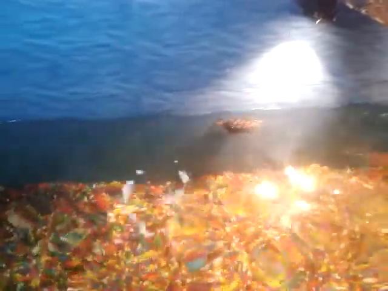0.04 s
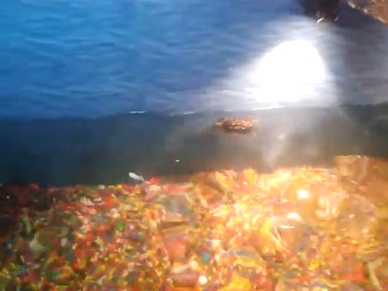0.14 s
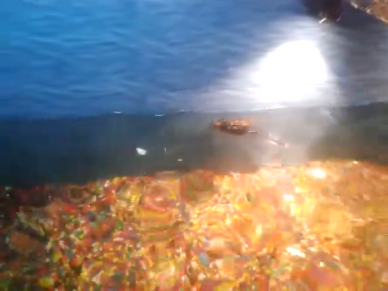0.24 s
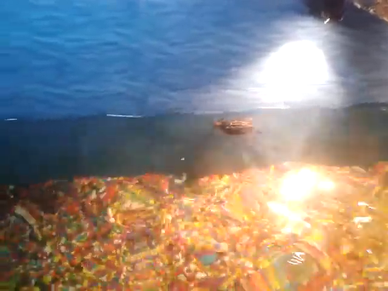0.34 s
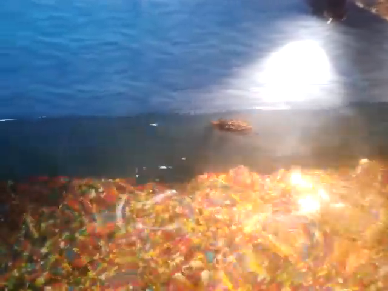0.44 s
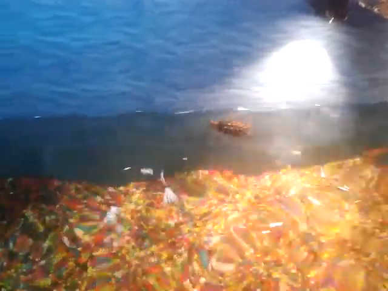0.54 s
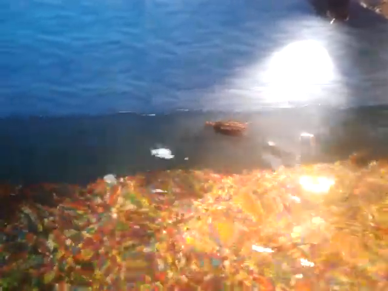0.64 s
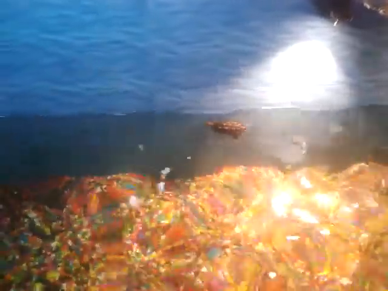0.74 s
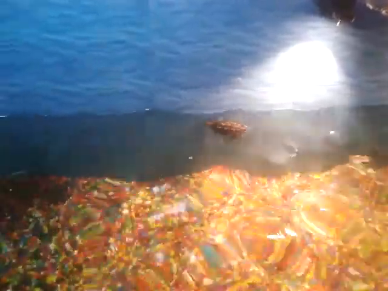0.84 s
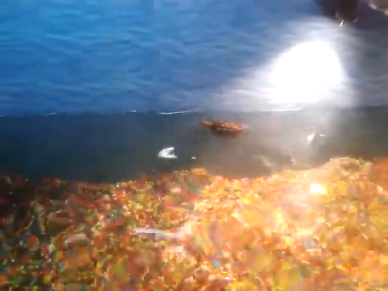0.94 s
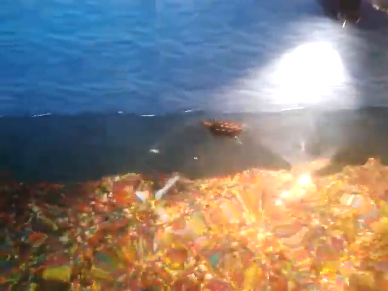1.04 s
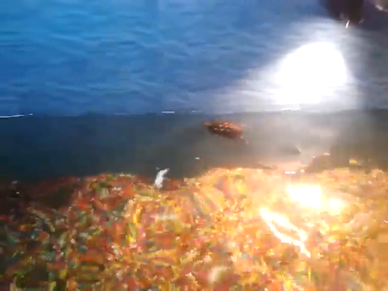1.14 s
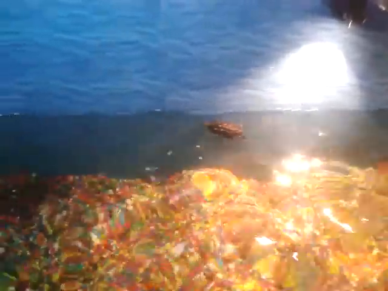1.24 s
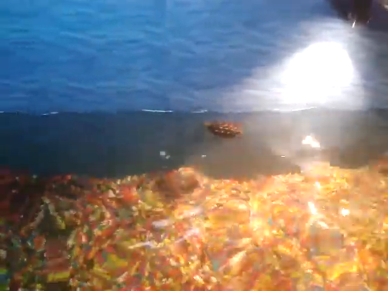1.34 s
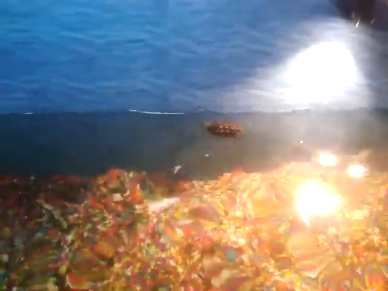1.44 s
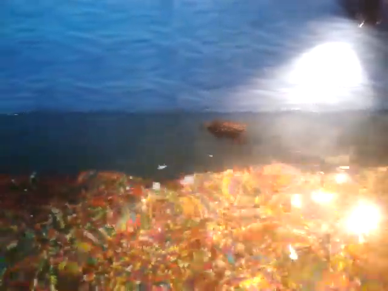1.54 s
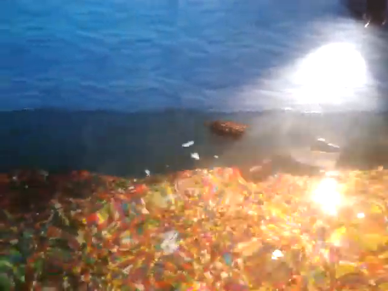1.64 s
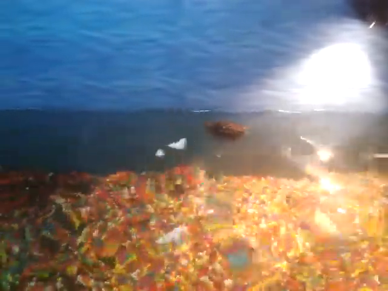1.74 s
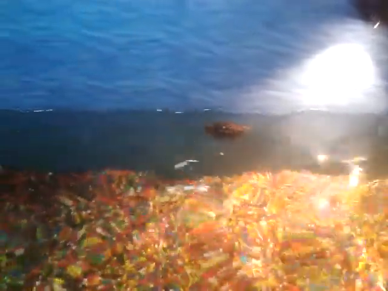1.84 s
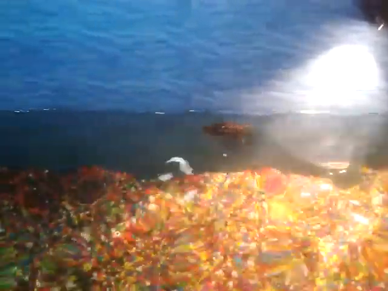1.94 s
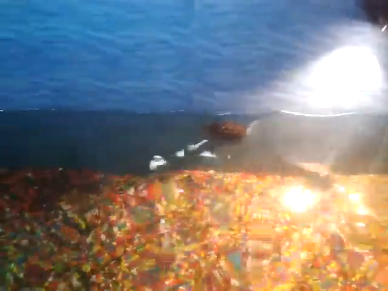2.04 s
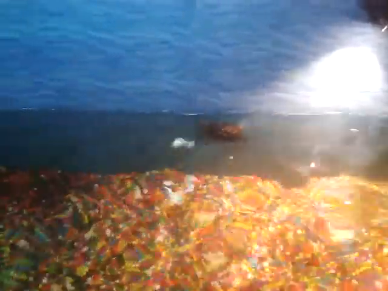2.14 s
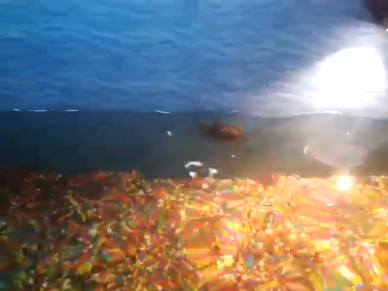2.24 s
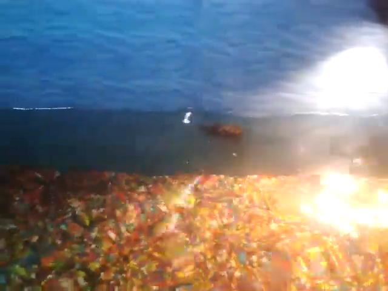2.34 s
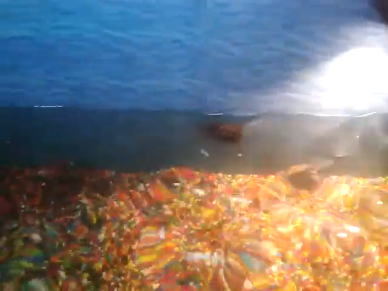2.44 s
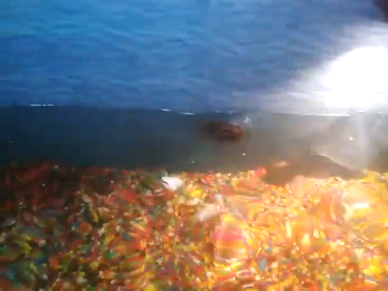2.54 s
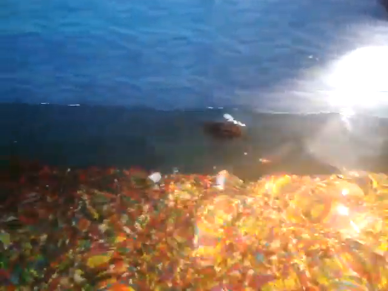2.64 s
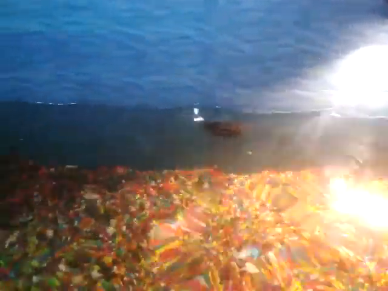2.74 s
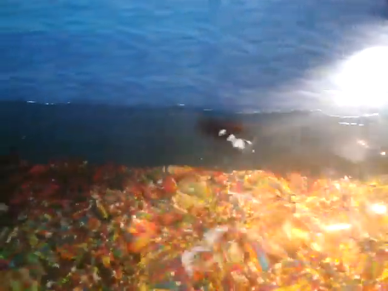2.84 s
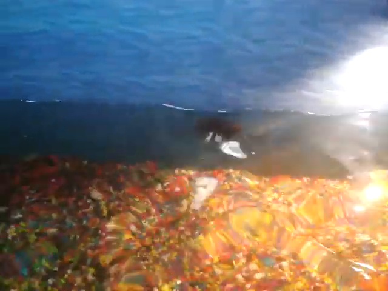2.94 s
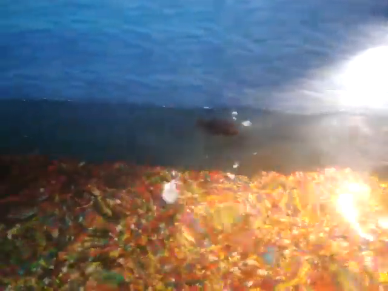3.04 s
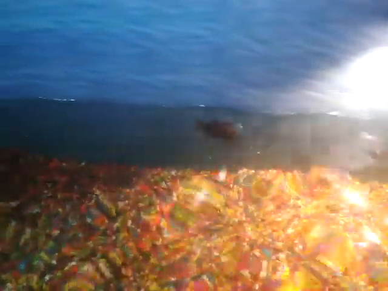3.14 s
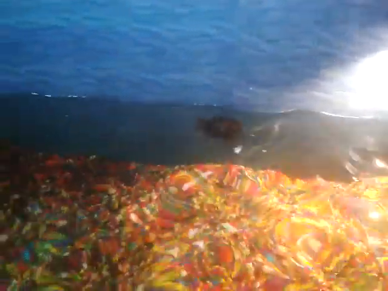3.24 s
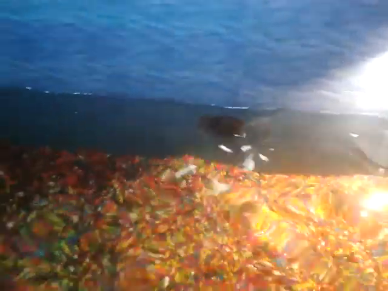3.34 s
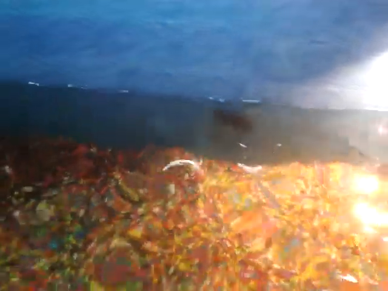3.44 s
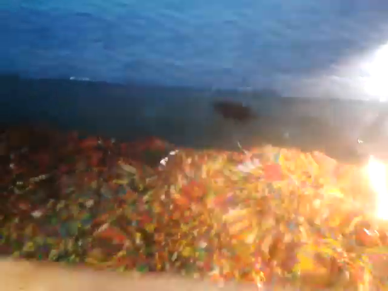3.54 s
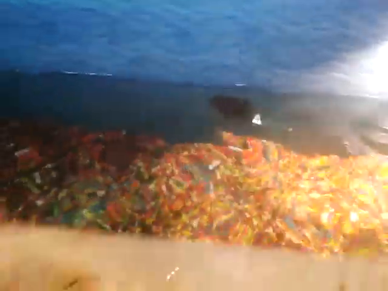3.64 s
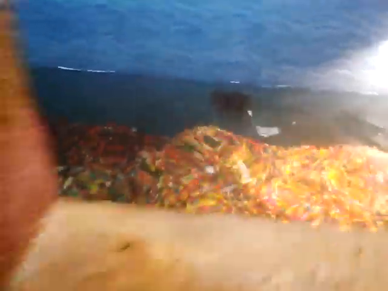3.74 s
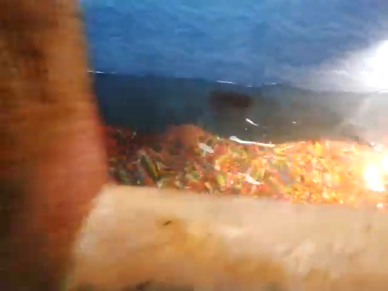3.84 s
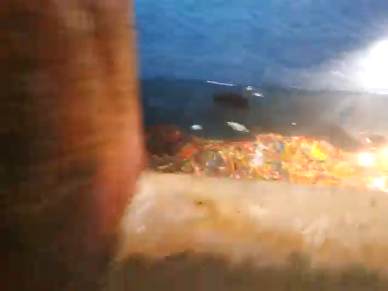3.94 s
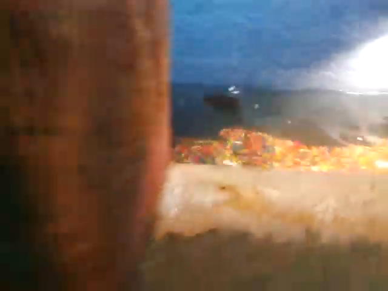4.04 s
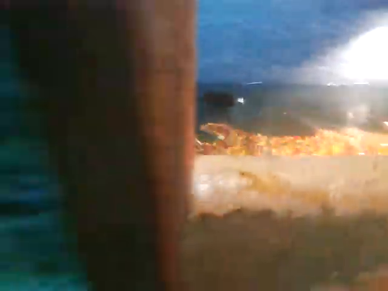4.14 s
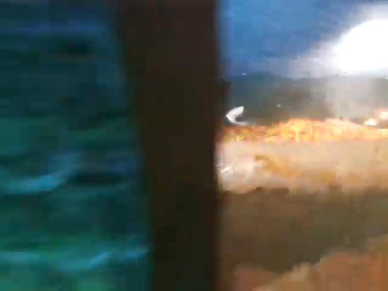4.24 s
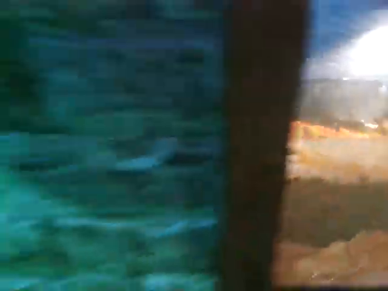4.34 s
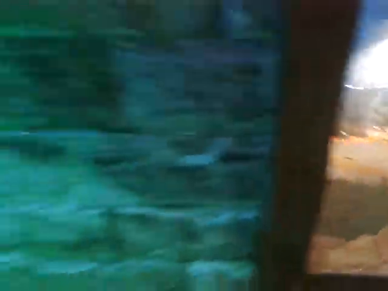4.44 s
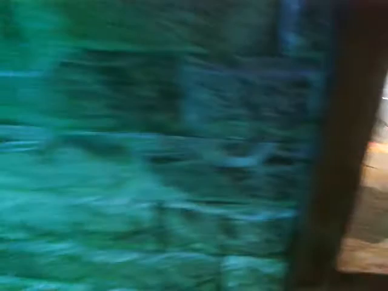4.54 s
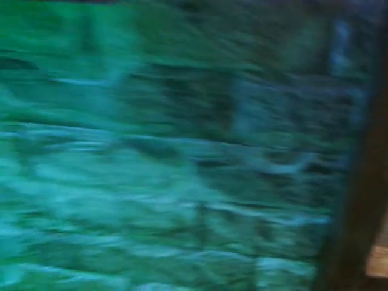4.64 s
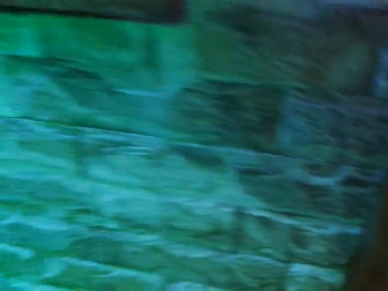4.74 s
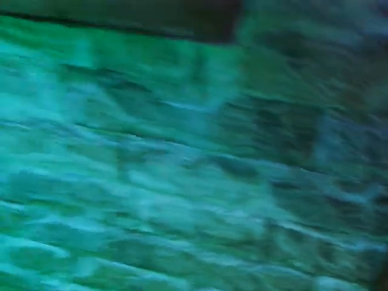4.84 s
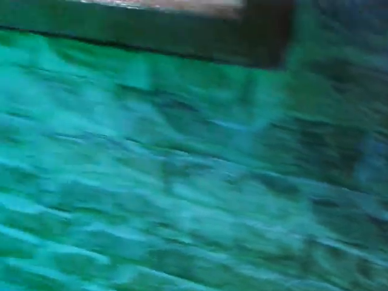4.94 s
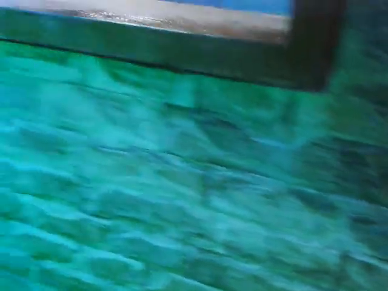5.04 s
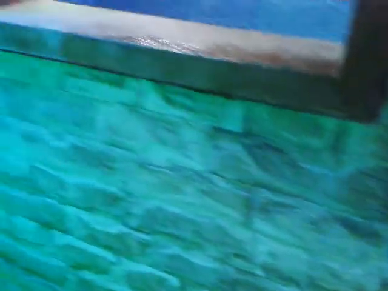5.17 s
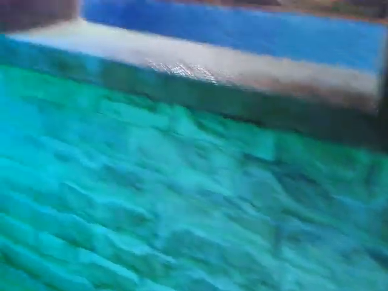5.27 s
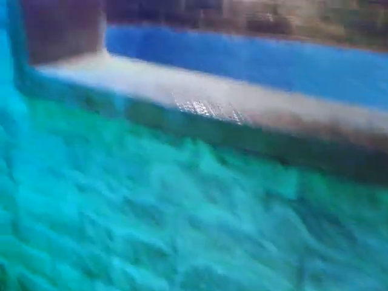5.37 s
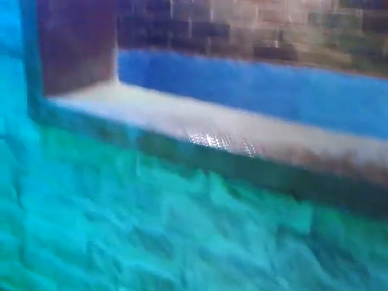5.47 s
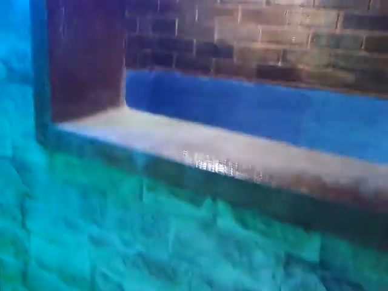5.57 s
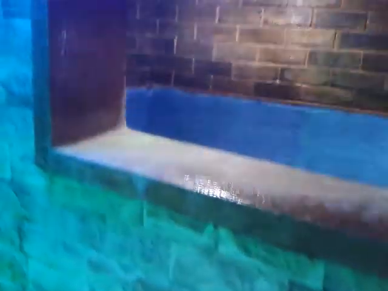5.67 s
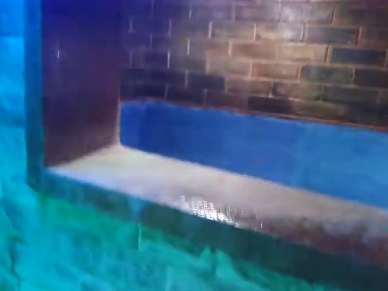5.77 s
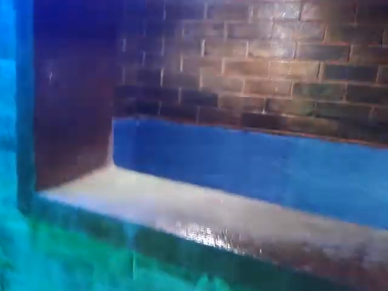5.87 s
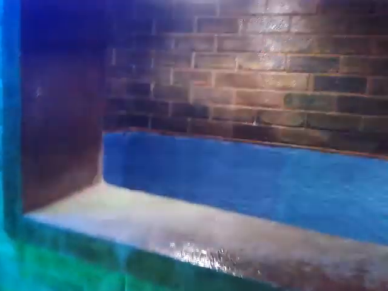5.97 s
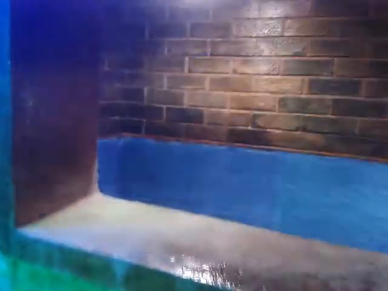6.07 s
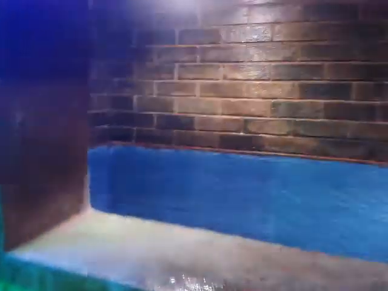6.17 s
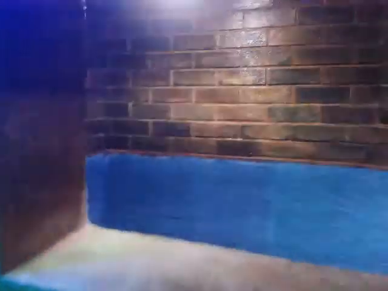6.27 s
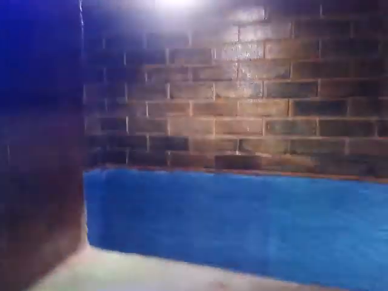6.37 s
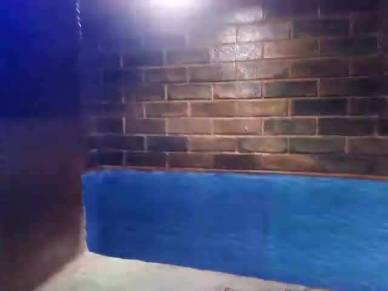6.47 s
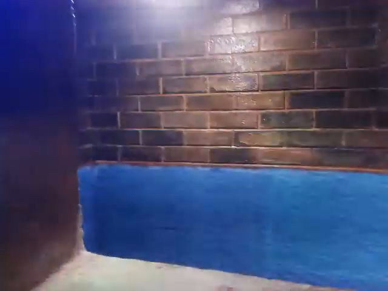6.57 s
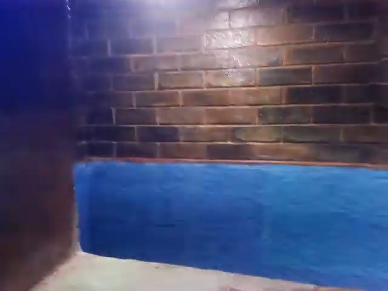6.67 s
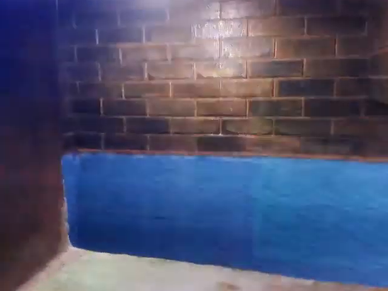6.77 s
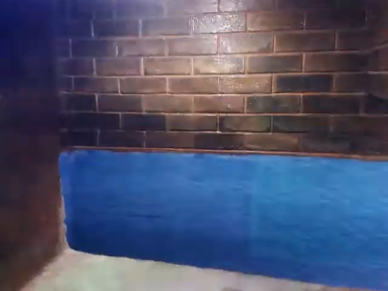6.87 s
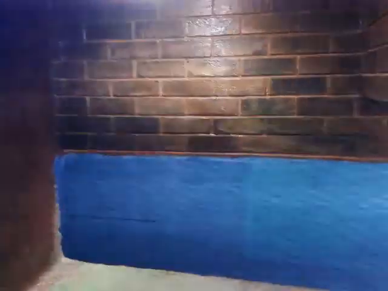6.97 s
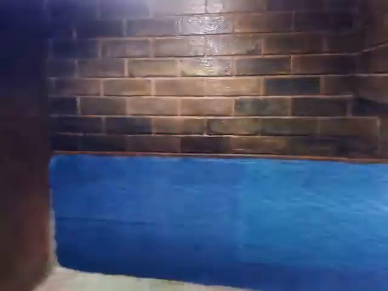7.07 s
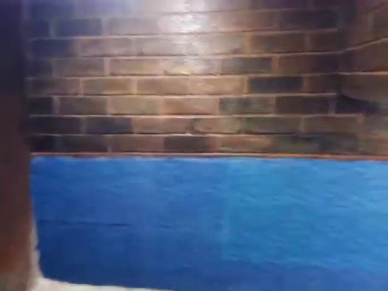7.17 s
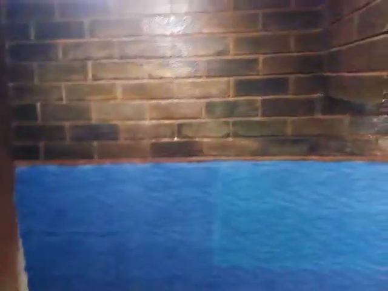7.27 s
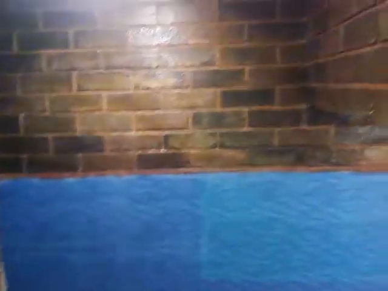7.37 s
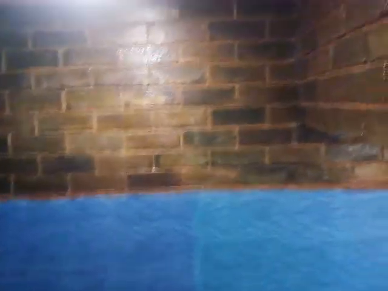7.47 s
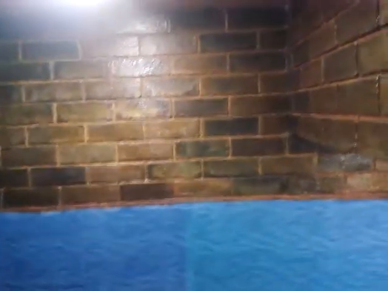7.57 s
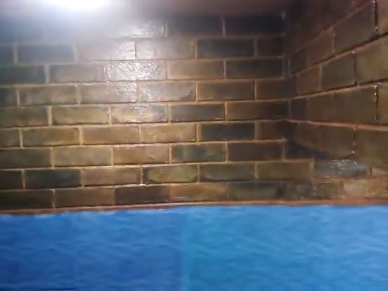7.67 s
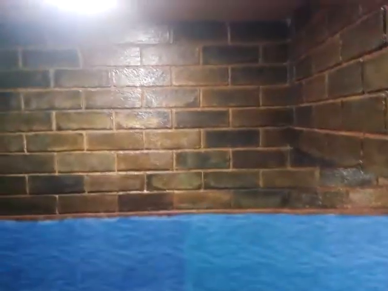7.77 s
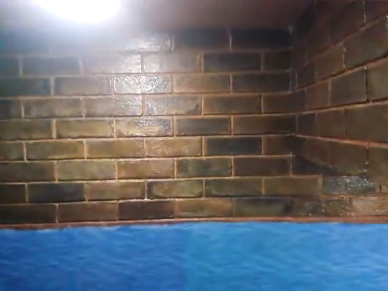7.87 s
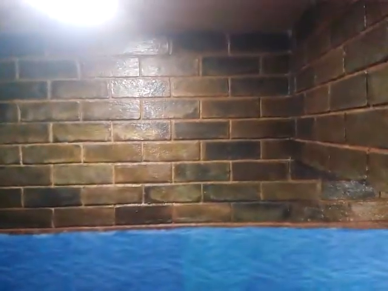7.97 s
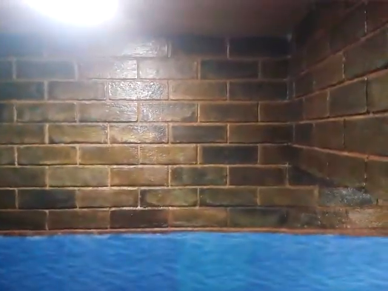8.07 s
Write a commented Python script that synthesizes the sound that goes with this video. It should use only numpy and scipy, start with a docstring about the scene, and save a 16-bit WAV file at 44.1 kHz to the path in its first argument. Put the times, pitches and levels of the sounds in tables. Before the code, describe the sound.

Close steady splashing water with bubbles and wet slaps, fading behind a wall, pulsing unevenly, then growing stronger after a short high squeak.

```python
"""Tiled indoor pond with a small ornamental waterfall: drops patter, bubbles ring, the plunge gurgles.
The microphone starts close to the fall, turns away behind a wall and comes round to another opening,
where the splashing arrives in stronger surges. One brief squeak sounds near the end.
Drops, slaps and spray are noise bursts, bubbles decaying sines, hiss shaped noise, the squeak a swept sine."""
import sys
import numpy as np
from scipy import signal
from scipy.fft import rfft, irfft, next_fast_len
from scipy.io import wavfile
from scipy.ndimage import map_coordinates

SR = 44100
rng = np.random.default_rng(int(sys.argv[2]) if len(sys.argv) > 2 else 0)


def to_wav(s):
    """Save 16-bit WAV."""
    ch = np.atleast_2d(s).T  # columns
    pcm = np.round(np.clip(ch, -1, 1) * 32767)  # PCM
    wavfile.write(sys.argv[1], SR, pcm.astype(np.int16))


N = 357651

# how directly the microphone faces the fall: t/s, share/0-1
FACING = [(0, 1), (2.3, 0.89), (3.8, 1), (4.7, 0.92), (5.25, 0.05), (6.8, 0.08), (7.3, 0.3), (8.1, 0.05)]
# closeness of the microphone to the basin rim: t/s, share/0-1
RIM_CLOSENESS = [(3.7, 0.7), (4.1, 0.26), (8.1, 0.05)]
# level of the fall between surges, before layer offsets: t/s, level/dB
FALL_LEVEL = [(0, -17), (3.85, -17.5), (3.95, -18.5), (4.35, -22), (5.2, -25), (5.95, -25.5), (6.85, -24.5),
              (7.15, -21), (8.11, -17.5)]
# the stream lands more heavily for a moment: start/s, length/s, gain/dB
SURGES = [(.08, 0.083, 2), (0.186, 0.12, 1), (0.608, .23, 1), (.85, 0.084, 2), (1.194, 0.31, 1.4),
          (1.62, 0.18, 1.5), (1.97, .09, 1), (2.14, 0.15, 2.5), (2.365, 0.14, 2.4), (2.553, 0.13, 1.5),
          (2.712, .16, 2.5), (2.922, 0.086, 1), (3.116, 0.29, 2), (3.464, 0.52, 1.1), (3.998, 0.2, 2),
          (4.208, 0.11, 2.5), (4.45, 0.25, 2.6), (4.723, 0.17, 3.5), (4.922, .1, 3), (5.23, .12, 3.5),
          (5.433, .11, 4.5), (5.54, .15, 3.5), (5.695, .11, 4.5), (6.012, 0.2, 4.6), (6.311, 0.16, 8),
          (6.577, 0.21, 8), (6.902, .28, 3.8), (7.22, .11, 2.0), (7.355, .14, 5), (7.584, .19, 3.3),
          (7.98, 0.1, 1.5)]
# relative spectra facing the fall (NEAR) and round the wall (FAR): f/Hz, level/dB per Hz
PATTER_NEAR = [(200, -75), (1500, -8.5), (2600, -13), (3300, -7), (4000, -5), (4700, -7), (5150, -0.5),
               (5520, 2), (5950, -4.5), (6500, -9), (7700, -10.5), (8900, -18), (10700, -19.5),
               (12700, -26)]
PATTER_FAR = [(200, -82), (1500, -20), (2600, -6.5), (3400, -4.5), (4000, 0.5), (4500, -3), (5200, -1),
              (5750, 1), (6800, -7), (7800, -6), (9300, -16.5), (10700, -16), (12700, -27), (14500, -23.5)]
BUBBLING_NEAR = [(200, -92), (1100, -20.5), (1200, -2.5), (1400, -2.5), (1600, 0.5), (2000, 2.5), (2320, 2),
                 (2700, -1), (3400, -20), (6000, -35)]
BUBBLING_FAR = [(200, -51), (900, -12), (1450, -5), (1800, 2), (2100, 2.5), (2400, 0), (2750, -7.5),
                (3400, -19), (6000, -52)]
# relative gurgle spectra at the rim and away from it: f/Hz, level/dB
GURGLE_NEAR = [(25, -70), (60, -47), (100, -31), (145, -26), (175, -12.5), (280, -14.5), (380, -7.5),
               (650, -2.5), (850, 1), (1050, 1.5), (1250, 0.5), (3000, -52)]
GURGLE_FAR = [(25, -70), (120, -31), (230, -9.5), (290, -13), (380, -5.5), (460, -7.5), (590, -5.5),
              (720, 0.5), (1050, 5.5), (1250, -4.5), (3000, -52)]
# hollow basin resonances, gain at full rim closeness: f/Hz, width/Hz, gain/dB over the water
BASIN_MODES = [(175.6, 13.5, 10.5), (230.6, 12.5, 12), (328.6, 8, 3.5), (458.4, 4.3, 12.5), (490, 6, 5),
               (860, 6.3, 9.5), (1004, 7, 3.5), (1242, 29, -15), (1482, 11, -24), (1720, 7.9, -21),
               (2130, 10, -9), (2312, 11, 6.5)]
# air pockets breaking into bubbles, before room and low cut: t/s, f/Hz, level/dB, length/s, pitch scatter/share
PLOPS = [(.002, 3180, -17, 0.035, 0.09), (0.191, 1600, -18, 0.024, 0.06), (.232, 1810, -14.5, 0.019, 0.061),
         (0.247, 2220, -24, 0.016, .04), (0.311, 1255, -24.5, .05, .06), (0.53, 780, -25, 0.015, 0.029),
         (.68, 2070, -22, 0.056, .03), (0.755, 2850, -17, .035, 0.1), (0.878, 1230, -26, 0.095, 0.014),
         (1.01, 1720, -18, 0.014, 0.013), (1.3, 365, -35.5, 0.059, 0.047), (1.34, 880, -27, 0.031, 0.077),
         (1.48, 807, -19.5, 0.032, 0.11), (1.5, 1120, -22, 0.03, .1), (1.5, 458, -27, 0.029, 0.14),
         (2.785, 2380, -21, 0.02, 0.028), (2.84, 610, -32, 0.058, 0.16), (2.91, 230.5, -35.5, 0.037, 0.037),
         (3.06, 1500, -23, 0.052, .012), (3.537, 2186, -22.5, .14, .001), (3.52, 1560, -26, .11, .012),
         (3.74, 2600, -21, .035, 0.068), (3.83, 1640, -19.5, 0.025, 0.1), (3.85, 776, -26.5, 0.038, 0.16),
         (4.939, 1980, -21, 0.033, 0.018), (5.474, 2570, -17.5, 0.018, .012),
         (5.49, 1544, -26.5, 0.023, .025), (5.555, 260, -45, 0.14, 0.034), (7.655, 2080, -19.5, 0.038, .02)]
# gobs of water slapping the surface, force envelopes: t/s, level/dB, t60/s
SLAPS = [(.197, -19, 0.022), (.236, -14, .05), (0.272, -10, .07), (0.768, -14, 0.026), (1.261, -16, 0.071),
         (1.645, -17, .12), (1.93, -15, 0.13), (2.38, -18, 0.32), (2.94, -15, .14), (4.02, -31.5, .015),
         (4.754, -32, 0.098), (6.672, -24, .04), (7.394, -14.5, 0.2)]
# relative slap spectrum: f/Hz, level/dB per Hz
SLAP_COLOUR = [(150, -70), (900, -26), (2000, 1), (4600, -4), (5600, 15.5), (6800, 4), (9000, -4.5),
               (12000, -10), (15700, -20)]
# decay of the tiled walls: f/Hz, t60/s
ROOM_T60 = [(200, 0.38), (2000, 0.54), (12000, 0.24)]

TOP_HZ = 15750
SURGE_SKEW, SURGE_ROUND = 0.88, 1  # powers: bring the crest forward, shape the flanks
# the plunge carries round the wall better: level, shares of the wall's loss and of the surges
PLUNGE_DB, PLUNGE_LOSS, PLUNGE_SURGE = -33, 0.48, 0.43
# start, pitch before bend and sag, level as the attack ends
SQUEAK_S, SQUEAK_HZ, SQUEAK_DB = 7.11, 3220, -17.5
LN_T60 = np.log(1000)  # 60 dB as an exponent


def amp(db):
    """Decibels to gain."""
    return 10 ** (np.asarray(db) / 20)


def unit(x):
    """Scale to rms 1."""
    return x / np.sqrt(np.mean(x ** 2) + 1e-20)


def along(points, hz):
    """Read (Hz, value) points on a log frequency axis."""
    f, v = np.transpose(points)
    return np.interp(np.log(hz + 1), np.log(f + 1), v)


def curves(rows):
    """One value per sample for each column after the time."""
    s, *cols = np.transpose(rows)
    return [np.interp(np.arange(N) / SR, s, c) for c in cols]


def wobble(knots_per_s):
    """Smooth random curve."""
    knots = rng.standard_normal(N // 100)
    return map_coordinates(knots, [np.arange(N) * knots_per_s / SR], mode="mirror")


def filtered(x, response):
    """Multiply the spectrum of x by a response of frequency."""
    size = next_fast_len(N + SR // 2)
    spectrum = rfft(x, size) * response(np.fft.rfftfreq(size, 1 / SR))
    return irfft(spectrum, size)[..., :N]


def coloured(x, spectrum):
    """Shape x by (Hz, dB) points, at rms 1."""
    return unit(filtered(x, lambda hz: amp(along(spectrum, hz))))


def add(track, s, sound):
    """Mix a sound into a track at time s."""
    start = max(round(s * SR), 0)
    track[start:start + len(sound)] += sound[:N - start]


def room(x, wet_db):
    """Diffuse answer of the tiled walls; it changes as splashes and microphone move, every 1/8 s."""
    wet, step = np.zeros(N), SR // 8
    for start in range(0, N, step):
        hz, t, z = signal.stft(rng.standard_normal(SR // 3), SR, nperseg=256)
        decay = np.exp(-LN_T60 * t / along(ROOM_T60, hz)[:, None])
        tail = signal.istft(z * decay, SR, nperseg=256)[1]
        tail /= np.linalg.norm(tail)
        add(wet, start / SR, signal.fftconvolve(x[start:start + step], tail))
    return x + amp(wet_db) * wet


def heard(x, near, far):
    """Direct sound while the fall is faced, reflected sound from round the wall."""
    share = np.clip(curves(FACING)[0], 0, 1)
    reflected = np.roll(room(x, wet_db=-9.0), SR // 10)  # 0.1 s by way of the far walls
    return np.sqrt(share) * coloured(x, near) + np.sqrt(1 - share) * coloured(reflected, far)


def basin(x):
    """Add the basin's resonant modes, strong only close to its rim."""
    def modes(f):
        return sum(amp(db) * 1j * f * w / (c * c - f * f + 1j * f * w) for c, w, db in BASIN_MODES)
    return x + curves(RIM_CLOSENESS)[0] * filtered(x, modes)


def surge_db():
    """Each surge is a rounded swell that rises a little faster than it ebbs."""
    t = np.arange(N) / SR
    total = np.zeros(N)
    for s, length_s, db in SURGES:
        progress = t[t < length_s] / length_s
        add(total, s, db * np.abs(np.sin(np.pi * progress ** SURGE_SKEW)) ** SURGE_ROUND)
    return total


def flow_db():
    """Level of the falling water at the microphone, before layer offsets."""
    return curves(FALL_LEVEL)[0] + surge_db()


def bubbles_db():
    """Bubbles follow the flow, but the wall shields them less than the patter."""
    return flow_db() - 2.0 - 3.57 * curves(FACING)[0]


def bubble(t, hz, t60_s, rise):
    """A trapped bubble rings down; its pitch rises as it nears the surface."""
    age = t / t60_s
    ring = np.sin(2 * np.pi * hz * t * (1 + rise * age / 2))
    return ring * np.exp(-LN_T60 * age) * (1 - np.exp(-t * hz))


def bubble_cloud(low_hz, high_hz, cycles, rise, spread_db, count, size):
    """Count bubbles of random time, pitch, strength and decay, at rms 1; size in samples."""
    when, pitch, strength, life = rng.random((count, 4)).T[:, :, None]
    hz = low_hz * (high_hz / low_hz) ** pitch
    gain = amp(-spread_db * np.log(strength + 0.017))  # spread above 0: few loud, many soft
    rings = gain * bubble(np.arange(size) / SR, hz, cycles * (.5 + life) / hz, rise)
    place = (when * N).astype(int) + np.arange(size)
    return unit(np.bincount(place.ravel(), rings.ravel(), N)[:N])


def cluster(hz, length_s, scatter, cycles, count):
    """Like-sized bubbles released in turn, rms 1 over their length; calm ones hold their pitch."""
    t = np.arange(SR // 4) / SR
    delay, size = rng.random((count, 1)), rng.standard_normal((count, 1))
    age_s = np.maximum(t - length_s * (np.arange(count)[:, None] + delay) / count, 0)
    rings = bubble(age_s, hz * np.exp(scatter * size), cycles / hz, rise=scatter).sum(0)
    return rings * np.sqrt(length_s * SR / np.sum(rings ** 2))


def impacts(rate_hz, power_decay_s, spread_db):
    """Random hits, each a noise burst that starts at once and dies in milliseconds; rms 1."""
    strength = amp(spread_db * np.minimum(rng.standard_normal(N), 2))
    hits = (rng.random(N) < rate_hz / SR) * strength ** 2
    power = signal.lfilter([1], [1, -np.exp(-1 / (power_decay_s * SR))], hits)
    return unit(np.sqrt(np.abs(power)) * rng.standard_normal(N))


def patter():
    """Drops hit the pond and leave a fizz of tiny bubbles, over a smooth hiss."""
    drops = impacts(rate_hz=260, power_decay_s=0.0063, spread_db=0.0)
    fizz = bubble_cloud(2527, 9400, cycles=66, rise=0.23, spread_db=-0.5, count=5000, size=512)
    water = drops + amp(-9.5) * fizz + amp(3.0) * rng.standard_normal(N)
    return amp(flow_db() - 1.52 + 0.8 * wobble(30)) * heard(water, PATTER_NEAR, PATTER_FAR)


def spray():
    """Stray droplets tick on the water nearby, softer round the wall."""
    hits = impacts(rate_hz=110, power_decay_s=0.007, spread_db=3.4)
    ticks = coloured(hits, [(300, -70), (3000, -9), (5600, 11.5), (9000, -13), (15700, -9.5)])
    return amp(flow_db() - 6.5) * (0.52 + 0.3 * curves(FACING)[0]) * ticks


def tinkle():
    """Drops near the microphone each trap one bubble: high pings and rounder blips."""
    pings = bubble_cloud(4210, 6910, cycles=110, rise=0.037, spread_db=2.5, count=700, size=1200)
    blips = bubble_cloud(1148, 2497, cycles=207, rise=0.081, spread_db=2.5, count=260, size=5000)
    drips = amp(flow_db() - 8.5) * pings + amp(bubbles_db() - 7.5) * blips
    drips *= 0.17 + 0.57 * curves(FACING)[0]
    return filtered(drips, lambda hz: amp(along([(200, -40), (900, -1)], hz)))


def bubbling():
    """Air dragged under by the stream rings as a crowd of small bubbles, over noise."""
    cloud = bubble_cloud(1061.3, 3113, cycles=129, rise=0.15, spread_db=0.0, count=2400, size=2000)
    water = basin(cloud + amp(9.5) * rng.standard_normal(N))
    return amp(bubbles_db() - 2.0 + 0.36 * wobble(16)) * heard(water, BUBBLING_NEAR, BUBBLING_FAR)


def plunge():
    """Large bubbles and noise gurgle where the stream dives in; the colour shifts away from the rim."""
    cloud = bubble_cloud(259.8, 1198, cycles=39, rise=0.11, spread_db=1.5, count=1400, size=3000)
    churn = basin(cloud + amp(12) * rng.standard_normal(N))
    share = np.clip(curves(RIM_CLOSENESS)[0], 0, 1)
    gurgle = share * coloured(churn, GURGLE_NEAR) + (1 - share) * coloured(churn, GURGLE_FAR)
    level_db, = curves(FALL_LEVEL)
    swell_db = PLUNGE_LOSS * (level_db - level_db.max()) + PLUNGE_SURGE * surge_db()
    return amp(PLUNGE_DB + swell_db + 1.14 * wobble(15)) * gurgle


def wash():
    """Hiss of the whole pool: shaped noise, even from place to place."""
    colour = [(25, -42), (70, -36), (200, -10), (900, -6), (2000, 3), (2900, -0.5), (4000, 4.5),
              (4700, -13.0), (5700, 4.5), (9000, -12), (15700, -26)]
    return amp(-32) * coloured(rng.standard_normal(N), colour)


def plops():
    """Pockets of air burst into small clusters of bubbles that stand out of the crowd."""
    track = np.zeros(N)
    for s, hz, db, length_s, scatter in PLOPS:
        cycles = 8 / np.sqrt(abs(scatter) + 0.0019)  # calm bubbles ring longer
        add(track, s, amp(db) * cluster(hz, length_s, scatter, cycles, count=10))
    return filtered(room(track, wet_db=-4), lambda hz: amp(along([(50, -34), (200, -5)], hz)))


def slaps():
    """Gobs of water slap down and throw a bright spray: decaying force times dense impacts."""
    force, t = np.zeros(N), np.arange(SR // 4) / SR
    for s, db, t60_s in SLAPS:
        add(force, s, amp(db) * np.exp(-LN_T60 * t / t60_s))
    splash = force * impacts(rate_hz=3100, power_decay_s=.0014, spread_db=4)
    return np.std(splash) * coloured(splash, SLAP_COLOUR)  # colour keeps the level


def squeak(length_s=0.096, attack_s=0.025, bend_hz=600, bend_s=0.0085, sag_hz_per_s=3200, fade_db_per_s=150):
    """Short swept sine that bends up, then sags and fades."""
    t = np.arange(round(length_s * SR)) / SR
    hz = SQUEAK_HZ - bend_hz * np.exp(-t / bend_s) - sag_hz_per_s * t
    ramps = np.clip(np.minimum(t, length_s - t) / attack_s, 0, 1)
    envelope = ramps * amp(SQUEAK_DB - fade_db_per_s * (t - attack_s))
    track = np.zeros(N)
    add(track, SQUEAK_S, envelope * np.sqrt(2) * np.sin(2 * np.pi * np.cumsum(hz) / SR))
    return room(track, wet_db=-31)


def scene():
    """One microphone feeds both channels."""
    water = patter() + spray() + tinkle() + bubbling() + plunge() + wash()
    mono = water + plops() + slaps() + squeak()
    return np.array([mono, mono])


def record(dry):
    """The recorder keeps nothing above its band limit."""
    return filtered(dry, lambda hz: hz < TOP_HZ)


dry = scene()
out = record(dry)
to_wav(out)
```